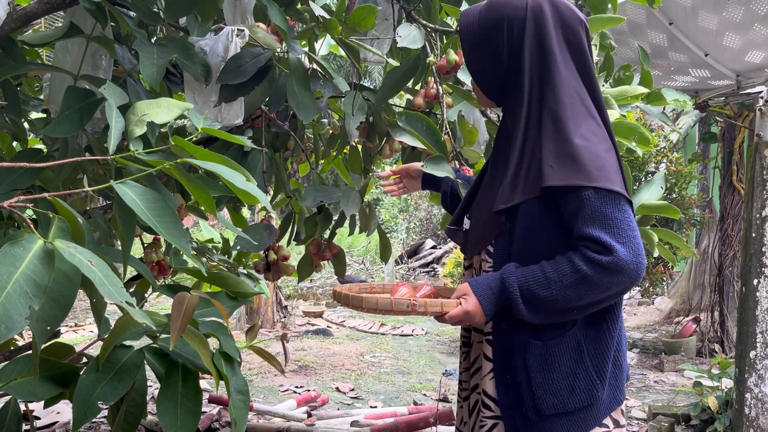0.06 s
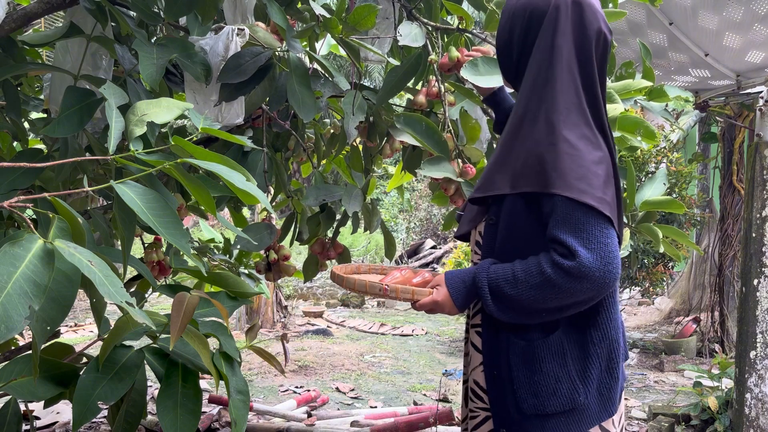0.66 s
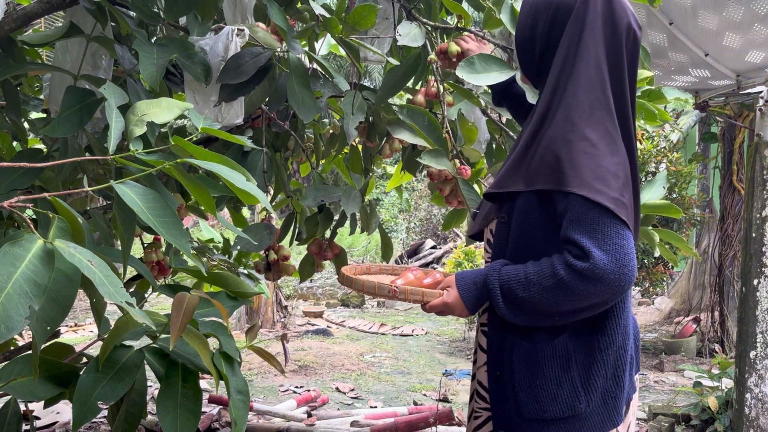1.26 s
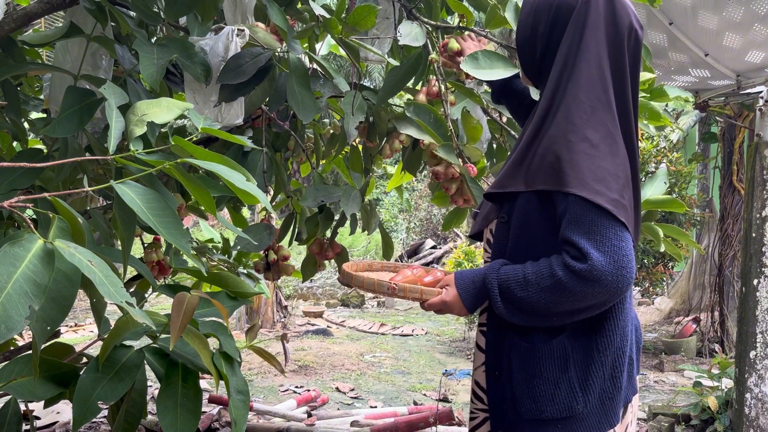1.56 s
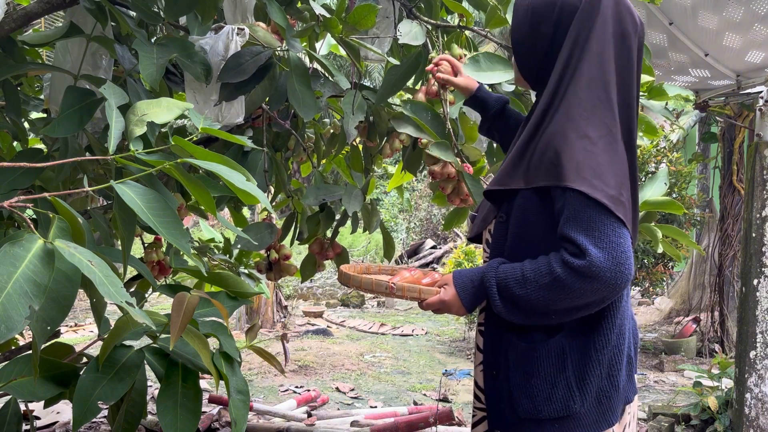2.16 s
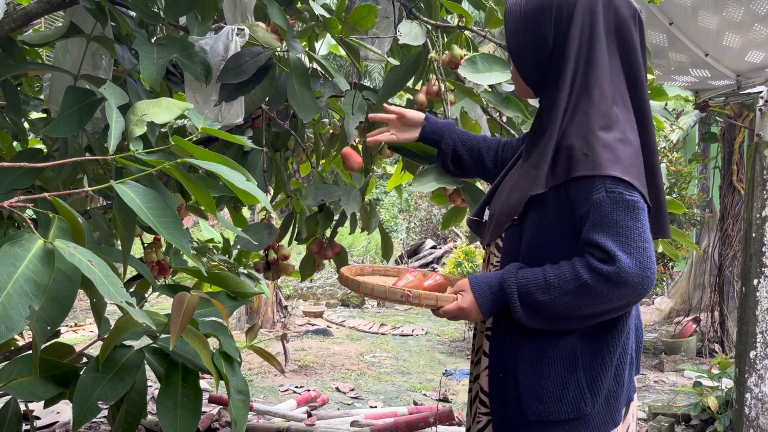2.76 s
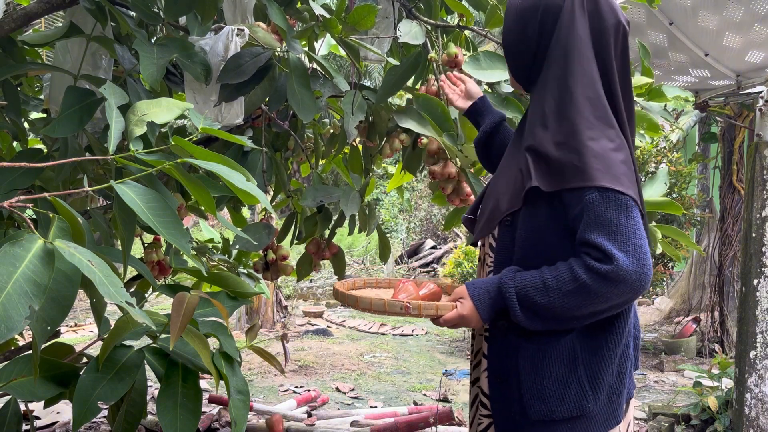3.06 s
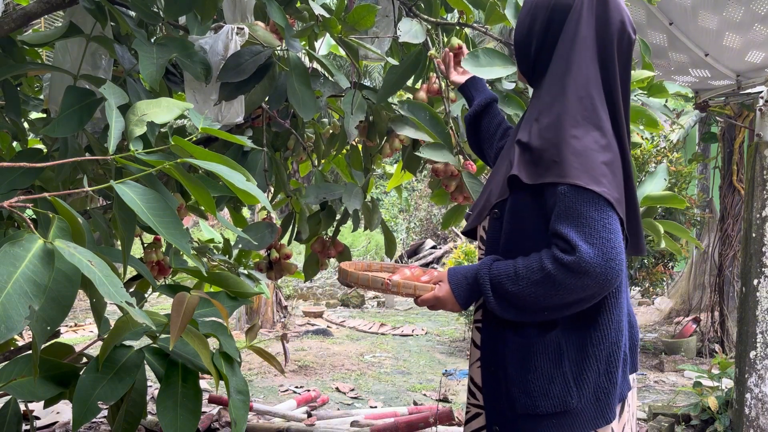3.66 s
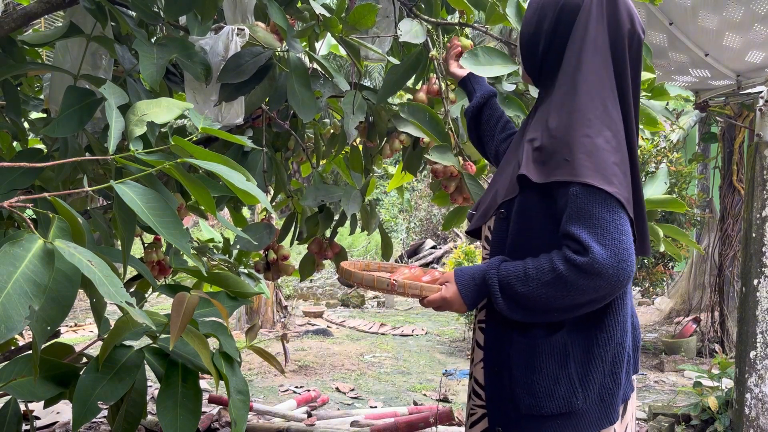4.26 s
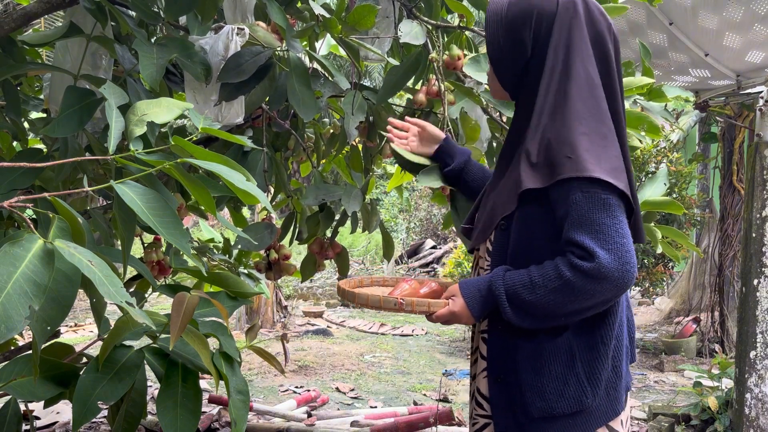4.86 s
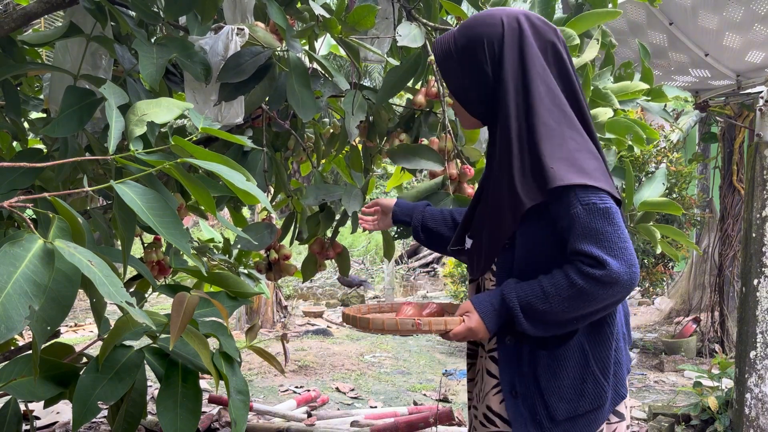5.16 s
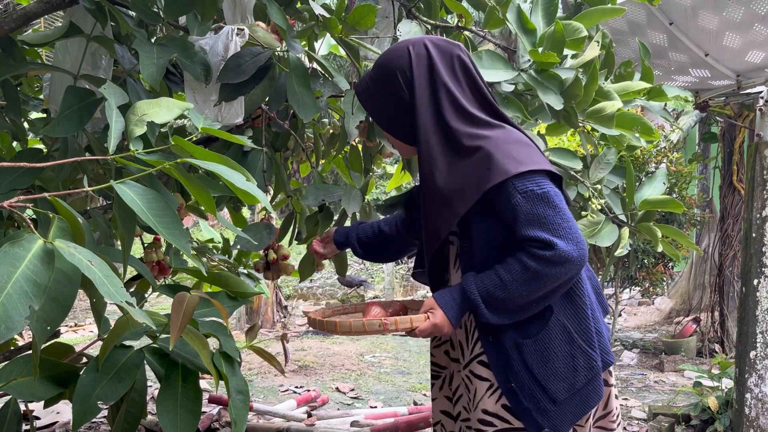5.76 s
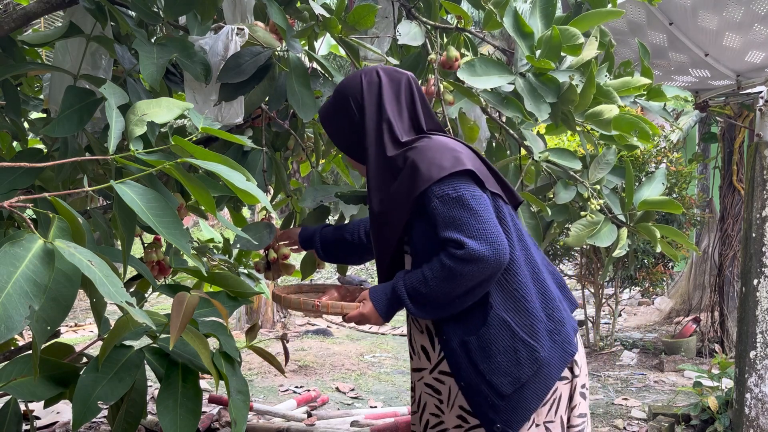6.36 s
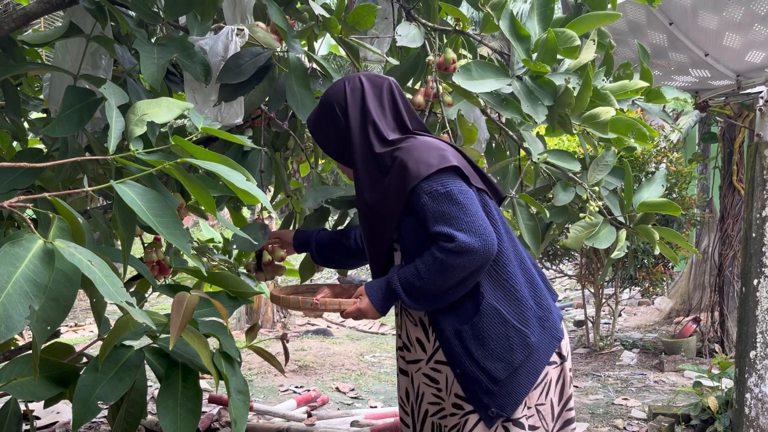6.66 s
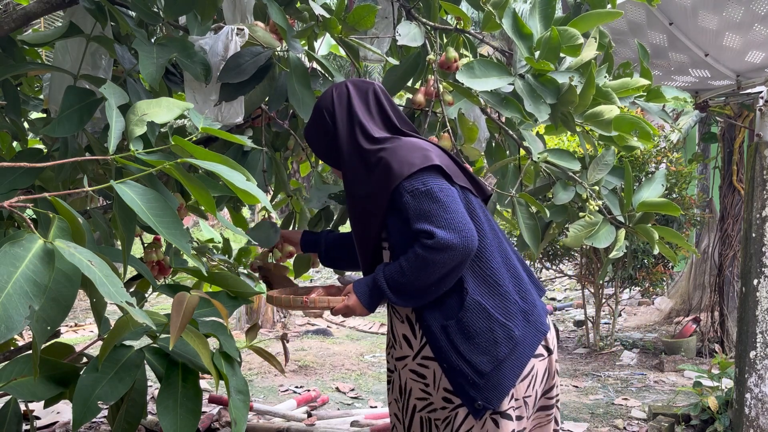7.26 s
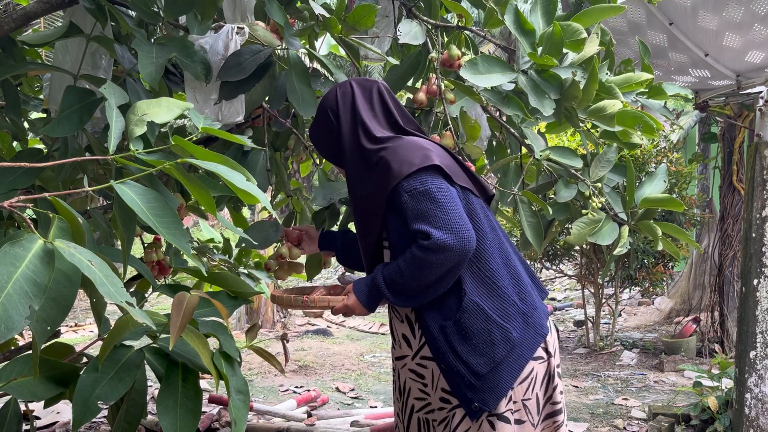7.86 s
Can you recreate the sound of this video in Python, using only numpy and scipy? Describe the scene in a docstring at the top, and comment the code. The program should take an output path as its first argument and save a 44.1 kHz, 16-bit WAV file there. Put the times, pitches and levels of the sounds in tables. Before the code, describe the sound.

Close by in a quiet garden, leaves rustle, a stalk snaps and picked fruit drops onto dry leaves with a crunchy thud. After a lull another fruit lands with a hollow knock and bounces. Then comes a longer spell of rustling with sharp snaps and tearing as more is pulled off, and one last light drop. Birds call softly throughout, over faint clucks, insects and a low distant rumble.

```python
"""Small fruit is picked from a garden tree: leaves rub, stalks snap and tear, and loose fruit
drops onto leaf litter with a crunch, a thud, a hollow ring and a bounce. Feet shift on the soil.
Behind it, a bird repeats arched calls, small birds whistle, far fowl cluck and insects buzz
over a low distant rumble."""
import sys
import numpy as np
from scipy import signal
from scipy.fft import rfft, irfft
from scipy.io import wavfile
from scipy.ndimage import uniform_filter1d

SR = 44100
rng = np.random.default_rng(int(sys.argv[2]) if len(sys.argv) > 2 else 0)


def to_wav(sig):
    """Store sig (one row per channel, or 1-D mono) as 16-bit WAV at the path in sys.argv[1].

    Samples outside -1..1 are clipped; the rate is SR.
    """
    pcm = np.clip(np.atleast_2d(sig), -1, 1) * 32767
    pcm = np.round(pcm).astype(np.int16)
    wavfile.write(sys.argv[1], SR, pcm.T)  # frames by channels


N = 353682

# Distant rumble and air. Each row: frequency in Hz, gain in dB.
AIR_SPECTRUM = [(15, -87), (25, -34.5), (70, 1), (110, -0.5), (160, -4), (230, -17.5), (350, -22.5),
                (640, -25), (1400, -29), (2700, -27), (4300, -27), (6500, -37.5), (10000, -47),
                (16000, -46.5)]
# Each row: start in seconds, length in seconds, centre in Hz, width in Hz, level in dB, swell in dB.
INSECT_BUZZES = [(0, 2.14, 9950, 750, -79.5, 4), (3.3, 1.7, 9620, 700, -84, 0),
                 (1.85, .4, 7550, 300, -88, 0), (3.4, .16, 7550, 300, -85, 0),
                 (7.3, .72, 7600, 300, -88, 0)]
# Each row: start in seconds, length in seconds, start and end pitch in Hz, throat resonance in Hz,
# hoarseness from 0 to 1, relative level in dB.
FOWL_CLUCKS = [(1.126, 0.039, 270, 345, 695, .6, -66.5), (1.152, 0.042, 358, 362, 1065, 0.72, -62.5),
               (1.191, 0.03, 363, 316, 704, 0.9, -68.5), (2.785, 0.16, 439, 468.6, 1480, 0.44, -69.5),
               (2.906, 0.1305, 469, 404, 1154, 0.38, -68), (7.941, 0.17, 412, 510, 1390, 0.33, -67.5)]
# Birds that keep chirping. Each row: pitch in Hz, chirps per second, level in dB.
FAR_BIRDS = [(3360, 3, -78.5), (4220, 4, -77.5)]
# Small birds. Each row: start and length in seconds, start and end pitch in Hz, relative level in dB.
FAR_CHIRPS = [(.234, 0.078, 4570, 5030, -54.5), (1.442, 0.04, 5300, 3620, -67),
              (1.472, 0.053, 5340, 5350, -65.5), (1.582, 0.024, 3410, 3270, -61),
              (1.797, .16, 4630, 4680, -67.5), (2.04, .11, 3470, 3490, -65.5),
              (2.308, 0.044, 3440, 3480, -65.5), (3.911, 0.03, 5000, 3650, -67.5),
              (4.276, .097, 4280, 3940, -70), (4.539, .085, 3450, 3140, -67),
              (4.798, 0.098, 3116, 3054, -65.5), (5.016, 0.12, 4200, 4190, -60.5),
              (6.86, 0.0676, 4440, 4140, -64)]
CLEAR_WHISTLES = [(2.085, 0.091, 2685, 4020, -59.5), (5.42, 0.059, 4530, 4790, -50),
                  (5.825, 0.068, 3410, 4180, -51), (6.545, 0.042, 2410, 2436, -63.5),
                  (6.745, 0.085, 3255, 4460, -54)]
# Near bird's call. Each row: share of the call's length, share of its top pitch.
CALL_ARCH = [(0, .8), (.15, .94), (.32, 1), (.64, .96), (.82, .83), (1, .71)]
# Its phrase. Each row: offset in seconds, pitch ratio to the opening call, accent in dB.
CALL_PHRASE = [(0, 1, -5), (.077, 1.155, -1), (.176, 1.2, 0), (.382, 1.14, -1), (.586, 1.14, -5),
               (.78, 1.195, -5), (1.06, 1.095, 0), (1.32, 1.115, -1)]
# Its songs. Each row: start in seconds, number of calls, opening pitch in Hz, level in dB.
SONGS = [(0.15, 1, 2004, -49), (0.971, 4, 1987, -55), (2.185, 1, 1925, -58), (2.348, 1, 1840, -62),
         (2.557, 4, 1893, -58.5), (4.005, 8, 1960, -59), (6.814, 2, 1920, -56.5), (7.014, 1, 1840, -62.5),
         (7.516, 3, 1876, -58.5)]

# Feet on soil. Each row: start in seconds, level in dB, T60 in seconds.
FOOT_SHIFTS = [(5.935, -50, 0.64), (6.059, -60, 1)]
# The pulled branch. Each row: time in seconds, level of its leaves in dB.
BRANCH_SWAY = [(0, -75), (.2, -70), (.4, -59.5), (.68, -77.5), (1.0, -70.5), (1.4, -88), (2.5, -97),
               (2.68, -78.5), (3.4, -88), (4.5, -87), (4.92, -66.5), (5.4, -63), (5.9, -57.5), (6.4, -59.5),
               (6.6, -67.5), (7.22, -68), (7.48, -75.5), (8.02, -76)]
# The hand in the leaves. Each row: peak time in seconds, hold in seconds, level in dB.
HAND_STROKES = [(0.268, 0.073, -54), (0.502, 0.051, -56), (4.95, .06, -59), (5.21, 0.029, -59),
                (5.497, 0.038, -46), (5.58, 0.029, -52), (6.034, 0.031, -52), (6.203, .085, -44),
                (7.63, 0.13, -66)]
# Rubbing leaves. Each row: frequency in Hz, gain in dB.
LEAF_HISS_SPECTRUM = [(600, -11.5), (1500, 0), (2500, 2), (4000, 3), (6000, 1.5), (9000, -1.5), (13000, -2),
                      (16000, -11.5)]
LEAF_BODY_SPECTRUM = [(100, -13.5), (250, 1), (500, -2), (800, 0), (1200, -2), (2000, -7), (3500, -7.5),
                      (8000, -54)]
# Stalks breaking. Each row: start in seconds, crack in dB, knock relative to the crack in dB.
STALK_SNAPS = [(0.1984, -43.5, -25), (.2761, -26, -14), (1.5684, -45, -1.5), (2.609, -55.5, -26),
               (3.557, -58, -1.5), (4.6023, -50, -41), (5.004, -43, -29), (5.2630, -55, 10.5),
               (5.374, -41, 0), (5.5511, -26.5, -4), (5.5538, -19.5, -2.5), (5.6059, -31, -7),
               (5.6470, -40.5, 3.5), (5.709, -36, -7), (5.8107, -31.5, -3), (5.9902, -48.5, 12.5),
               (6.2745, -28, -7), (6.2862, -24.5, -24), (6.3111, -33.5, -13), (6.414, -42, -7),
               (6.7357, -39.5, -7.5), (6.7883, -32.5, -3.5), (6.871, -39.5, 0), (6.942, -39.5, -29),
               (7.1560, -51.5, -3.5)]
# Fibre crack and woody knock. Each row: frequency in Hz, gain in dB.
CRACK_SPECTRUM = [(800, -6.5), (2500, -5.5), (5500, -3.5), (8000, -5.5), (12000, -7.5), (16000, -11.5)]
KNOCK_SPECTRUM = [(200, -46), (700, -3), (1150, 2.5), (1600, 5), (2100, 5), (3000, -3.5), (7000, -78)]
# Fruit landing. Each row: start and time to sink through the litter in seconds; crunch, thud, slap
# and ring in dB; ring tilt in dB per octave; gap between settling contacts in seconds.
FRUIT_DROPS = [(.1000, 0.00361, -35, -31.5, -35.5, -36.5, -8.5, .0121),
               (0.2663, 0.0046, -33, -36, -30, -51.5, 6, .007),
               (3.1760, .0085, -31.5, -38, -26.5, -37.5, 3, 0.00445),
               (7.6408, 0.0039, -31.5, -47, -45.5, -65.5, -4, .008)]
# Each row: start in seconds, then thud, ring and crunch in dB.
FRUIT_BOUNCES = [(.1470, -45.5, -43, -56), (3.202, -43, -38, -47.5), (3.2490, -49, -62, -60),
                 (3.2990, -47, -50, -60), (3.3530, -55.5, -77, -56), (3.5390, -61, -72, -79),
                 (7.6775, -51.5, -72, -51)]
# The hollow litter. Each row: frequency in Hz, gain in dB, T60 in seconds.
LITTER_MODES = [(245.2, -18, 0.23), (385, -23, 0.12), (544, 6, 0.1), (565, -4.5, 0.096), (872, -5.5, 0.07),
                (938, -3.5, 0.1), (1210, 11, 0.067), (1560, -17, 0.077), (2150, -31, 0.035),
                (2440, -31, 0.028)]
# Fruit on litter. Each row: frequency in Hz, gain in dB.
THUD_SPECTRUM = [(60, -49), (140, -6.5), (240, 3.5), (320, -1.5), (420, -4.5), (540, -13.5), (750, -3.5),
                 (1000, -14), (1500, -32), (5000, -37)]
SLAP_SPECTRUM = [(150, -25), (500, -10.5), (900, -3), (1400, -2.5), (2200, -4), (3200, -22.5),
                 (8000, -26.5)]
CRUNCH_SPECTRUM = [(500, -4.5), (2000, -1.5), (3200, -0.5), (4300, -3.5), (5500, 2), (7000, -5.5),
                   (8500, -7), (11000, -11.5), (16000, -15)]


def undb(db):
    """Decibels to gain."""
    return 10 ** (np.asarray(db) / 20)


def unit(x):
    """Scale to rms 1."""
    return x / np.sqrt(np.mean(x ** 2) + 1e-18)


def seconds(length_s):
    """Sample times of a short sound."""
    return np.arange(max(int(length_s * SR), 16)) / SR


def fade(t, t60_s):
    """Exponential decay."""
    return np.exp(-np.log(1000) * t / t60_s)


def add(out, at_s, x):
    """Mix a sound in at a time."""
    i = int(np.clip(at_s * SR, 0, N - 1))
    out[i:i + len(x)] += x[:N - i]


def colour(x, spectrum, size=4096):
    """Minimum-phase filter of unit power through (Hz, dB) points."""
    hz, db = np.transpose(spectrum)
    gain = undb(np.interp(np.log(np.fft.rfftfreq(size, 1 / SR) + 1), np.log(hz), db))
    cepstrum = irfft(np.log(unit(gain)))
    cepstrum[1:size // 2] *= 2
    cepstrum[size // 2 + 1:] = 0
    return signal.fftconvolve(x, irfft(np.exp(rfft(cepstrum))))[:len(x)]


def noise(count=N):
    """White noise."""
    return rng.standard_normal(count)


def wander(rate_hz, count=N, knots=4096):
    """Random drift with a spread near 1."""
    return np.interp(np.arange(count) / SR * rate_hz, np.arange(knots), noise(knots))


def moments(per_s, count=128):
    """Loosely spaced random times in seconds."""
    times_s = (np.arange(count) + rng.random(count)) / per_s
    return times_s[times_s < N / SR]


def grains(per_s, spread_db):
    """Random clicks of uneven size."""
    clicks = (rng.random(N) < per_s / SR) * np.sign(noise())
    return unit(clicks * undb(spread_db * np.minimum(rng.exponential(size=N), 4)))


def bursts(times_s, levels_db, t60s_s):
    """Envelope of sudden blows that die away."""
    power = np.zeros(N)
    for at_s, db, t60_s in zip(times_s, levels_db, t60s_s):
        add(power, at_s, (undb(db) * fade(seconds(1.5 * t60_s), t60_s)) ** 2)
    return np.sqrt(power)


def reflections(x, t60_s, wet_db, delay_s, cutoff_hz):
    """Ground, foliage and walls return a late, duller, fading tail."""
    t = seconds(1)
    tail = signal.sosfilt(signal.butter(1, cutoff_hz, fs=SR, output="sos"), noise(len(t)))
    tail *= fade(t, t60_s) * np.clip(t / delay_s - 1, 0, 1)
    return undb(wet_db) * signal.fftconvolve(x, unit(tail) / np.sqrt(len(t)))[:N]


def syllable(length_s):
    """Progress through a call from 0 to 1, and its soft-edged envelope."""
    t = seconds(length_s)
    progress = t / t[-1]
    return progress, np.clip(np.minimum(progress, 1 - progress) / .15, 0, 1)


def whistles(notes, flutter):
    """Sine notes that glide in pitch, fastest at the start."""
    out = np.zeros(N)
    for at_s, length_s, start_hz, end_hz, db in notes:
        progress, envelope = syllable(length_s)
        pitch_hz = start_hz + (end_hz - start_hz) * np.sin(progress * np.pi / 2)
        pitch_hz *= 1 + flutter * wander(700, len(progress), knots=512)
        add(out, at_s, undb(db) * envelope * np.sin(2 * np.pi * np.cumsum(pitch_hz) / SR))
    return out


def garden_air(level_db=-62.5):
    """A smooth wash of air whose distant low rumble throbs."""
    air = unit(colour(noise(), AIR_SPECTRUM))
    rumble = signal.sosfilt(signal.butter(1, 200, fs=SR, output="sos"), air)
    throb = undb(2.1 * wander(rate_hz=25))
    return undb(level_db) * (air + rumble * (throb - 1))


def far_chorus(count=130, note_s=.07):
    """Far birds blurred by reflection."""
    when, height, slide, strength = rng.random((count, 4)).T
    start_hz = 2900 + 2700 * height ** 2
    end_hz = start_hz * (.94 + .086 * slide)
    notes = zip(when * N / SR, np.full(count, note_s), start_hz, end_hz, -79 + 6 * strength)
    return reflections(whistles(notes, flutter=.023), t60_s=.14, wet_db=0, delay_s=.004, cutoff_hz=6700)


def insects(edge_s=.14):
    """Shrill buzzing in narrow noise bands."""
    t, out = np.arange(N) / SR, np.zeros(N)
    for at_s, length_s, hz, width_hz, db, swell_db in INSECT_BUZZES:
        band = signal.butter(2, [hz - width_hz / 2, hz + width_hz / 2], "band", fs=SR, output="sos")
        gain = undb(db + swell_db * np.clip((t - at_s) / length_s - .5, -.5, .5))
        gate = np.clip(np.minimum(t - at_s, at_s + length_s - t) / edge_s, 0, 1)
        out += gain * gate * unit(signal.sosfilt(band, noise()))
    return out * undb(wander(rate_hz=35))


def fowl():
    """Far clucks: voice and rasp through one throat resonance."""
    out = np.zeros(N)
    for at_s, length_s, start_hz, end_hz, throat_hz, hoarse, db in FOWL_CLUCKS:
        progress, envelope = syllable(length_s)
        pitch_hz = start_hz + (end_hz - start_hz) * progress
        pitch_hz *= 1 + .02 * wander(300, len(progress), knots=512)
        phase = 2 * np.pi * np.cumsum(pitch_hz) / SR
        throat = [(300, -20), (throat_hz * .7, -15), (throat_hz, 0), (throat_hz * 1.35, -18), (5000, -45)]
        voice = unit(colour(sum(np.cos(k * phase) for k in range(1, 8)), throat))
        rasp = unit(colour(noise(len(progress)), throat))
        add(out, at_s, undb(db) * envelope * ((1 - hoarse) * voice + hoarse * rasp))
    return undb(6.5) * out + reflections(out, t60_s=.33, wet_db=-3.1, delay_s=.0041, cutoff_hz=5000)


def hidden_birds(chirp_s=.0733, fall=.073, pitch_spread=.05):
    """Each far bird repeats a slightly falling note around its own pitch."""
    notes = []
    for centre_hz, per_s, db in FAR_BIRDS:
        for at_s, chance in zip(moments(per_s), noise(128)):
            hz = centre_hz * (1 + pitch_spread * chance)
            notes.append((at_s, chirp_s, hz, hz * (1 - fall), db))
    return whistles(notes, flutter=.028)


def near_bird(ref_length_s=.074, ref_hz=2250, stretch=1.94):
    """Songs share one phrase; each call rises, holds and drops, and higher calls last longer."""
    out = np.zeros(N)
    for at_s, count, opening_hz, db in SONGS:
        for offset_s, ratio, accent_db in CALL_PHRASE[:round(count)]:
            top_hz = opening_hz * ratio
            progress, envelope = syllable(ref_length_s * (top_hz / ref_hz) ** stretch)
            arch = uniform_filter1d(np.interp(progress, *np.transpose(CALL_ARCH)), size=300)
            pitch_hz = top_hz * arch * (1 + .014 * wander(500, len(progress), knots=512))
            phase = 2 * np.pi * np.cumsum(pitch_hz) / SR
            tone = np.sin(phase) + undb(-23) * np.sin(2 * phase) + undb(-27) * np.sin(3 * phase)
            effort_db = 5 * (progress - .5) + 2 * wander(108, len(progress), knots=512)
            add(out, at_s + offset_s, undb(db + accent_db + effort_db) * envelope * tone)
    return out


def birds():
    """Calls linger among the trees; hidden birds arrive by reflection only."""
    near = near_bird()
    far = whistles(FAR_CHIRPS, flutter=.016)
    clear = whistles(CLEAR_WHISTLES, flutter=.013)
    out = near + undb(-6) * far + undb(-5) * clear
    add(out, .024, undb(-9) * near)  # one short echo
    out += reflections(near, t60_s=.23, wet_db=-6, delay_s=.009, cutoff_hz=4500)
    out += reflections(clear, t60_s=.42, wet_db=-4, delay_s=.0082, cutoff_hz=7000)
    return out + reflections(far + hidden_birds(), t60_s=.46, wet_db=0, delay_s=.0011, cutoff_hz=5100)


def feet():
    """Weight settles on soft soil with a low bump."""
    soil_spectrum = [(40, -11), (100, 6), (160, -1.5), (400, -23), (2000, -72)]
    return colour(noise() * bursts(*np.transpose(FOOT_SHIFTS)), soil_spectrum)


def brushing_db(attack_s=.038, t60_s=.18):
    """Leaf level: branch sway plus hand strokes that swell, hold and decay."""
    t = np.arange(N) / SR
    power = undb(np.interp(t, *np.transpose(BRANCH_SWAY))) ** 2
    for at_s, hold_s, db in HAND_STROKES:
        swell = np.clip(1 + (t - at_s) / attack_s, 0, 1) ** 2
        decay = fade(np.clip(t - at_s - hold_s, 0, 2), t60_s)
        power += (undb(db) * swell * decay) ** 2
    return 10 * np.log10(power)


def leaves(brush_db):
    """Sliding leaves make dense grains; catching edges add sparse ticks."""
    friction = grains(per_s=12000, spread_db=2.5) + undb(-9) * grains(per_s=220, spread_db=3)
    hiss = friction * undb(brush_db + 1.7 * wander(rate_hz=90))
    body_db = -67.5 + .88 * (brush_db + 60)  # grows more slowly than the hiss
    body = grains(per_s=4000, spread_db=4.4) * undb(body_db)
    return colour(hiss, LEAF_HISS_SPECTRUM) + colour(body, LEAF_BODY_SPECTRUM)


def snapping_stalks(brush_db, snap_t60_s=.0062, tear_db=-13.5, tear_t60_s=.083):
    """Fibres crack, the twig knocks, the last fibres tear; small twigs tick as hard as leaves move."""
    breaks = []
    for at_s, db, woody_db in STALK_SNAPS:
        breaks.append((at_s, db, db + woody_db, snap_t60_s))
        breaks.append((at_s, db + tear_db, db + tear_db + woody_db, tear_t60_s))
    for at_s, jitter_db in zip(moments(per_s=11), 1 - 2 * rng.random(128)):
        tick_db = brush_db[int(at_s * SR)] + 14.5 + jitter_db
        breaks.append((at_s, tick_db, tick_db - 3.5, snap_t60_s))
    times_s, crack_db, knock_db, t60_s = np.transpose(breaks)
    crack = colour(np.sign(noise()) * bursts(times_s, crack_db, t60_s), CRACK_SPECTRUM)
    knock = colour(np.sign(noise()) * bursts(times_s, knock_db, t60_s), KNOCK_SPECTRUM)
    return crack + knock


def fruit_contacts(touch_db=-9, settle_db=-7.5, crushed_db=-7.5):
    """Fruit touches the litter, hits the ground and settles ever softer and duller; some bounce."""
    # Each row: start in seconds, ring in dB, tilt in dB per octave, thud, slap and crunch in dB,
    # T60 in seconds.
    rows = []
    for at_s, sink_s, crunch_db, thud_db, slap_db, ring_db, tilt, gap_s in FRUIT_DROPS:
        rows.append((at_s, ring_db + touch_db, tilt,
                     thud_db + touch_db, slap_db + touch_db, crunch_db, .032))
        for k in range(3):  # the impact, then two settling contacts
            rows.append((at_s + sink_s + k * gap_s, ring_db - 2 * k, tilt - 2 * k,
                         thud_db + k * settle_db, slap_db - 14 * k,
                         crunch_db + crushed_db + k * settle_db, .079 if k else .046))
    for at_s, thud_db, ring_db, crunch_db in FRUIT_BOUNCES:
        rows.append((at_s, ring_db, -7.5, thud_db, thud_db - 5.5, crunch_db, .1))
    return rows


def falling_fruit(detune=.007, pivot_hz=560):
    """Each contact thuds, slaps, crushes dry leaves and rings the hollow litter."""
    times_s, ring_db, tilts, thud_db, slap_db, crunch_db, t60_s = np.transpose(fruit_contacts())
    t, ring = seconds(.3), np.zeros(N)
    for at_s, db, tilt_db_per_octave in zip(times_s, ring_db, tilts):
        for hz, mode_db, mode_t60_s in LITTER_MODES:
            wave = np.sin(2 * np.pi * hz * (1 + detune * rng.standard_normal()) * t)
            gain = undb(db + mode_db + tilt_db_per_octave * np.log2(hz / pivot_hz))
            add(ring, at_s, gain * fade(t, mode_t60_s) * wave)
    thud = colour(noise() * bursts(times_s, thud_db, t60_s), THUD_SPECTRUM)
    slap = grains(per_s=9000, spread_db=.52) * bursts(times_s, slap_db, t60_s)
    crunch = grains(per_s=12000, spread_db=3.7) * bursts(times_s, crunch_db, t60_s)
    return ring + thud + colour(slap, SLAP_SPECTRUM) + colour(crunch, CRUNCH_SPECTRUM)


def scene():
    """The picking, its reflections and the garden around it, in mono."""
    brush_db = brushing_db()
    picking = falling_fruit() + snapping_stalks(brush_db) + leaves(brush_db) + feet()
    early = reflections(picking, t60_s=.06, wet_db=-13.5, delay_s=.001, cutoff_hz=16000)
    late = reflections(picking, t60_s=.35, wet_db=-25, delay_s=.026, cutoff_hz=14000)
    garden = birds() + fowl() + insects() + garden_air() + far_chorus()
    return (picking + early + late + garden)[None]


def record(dry):
    """The deepest bass and the very top are rolled off."""
    low_hz, top_hz = 42, 15800
    highpass = signal.butter(3, low_hz, "high", fs=SR, output="sos")
    lowpass = signal.ellip(10, .2, 70, top_hz, fs=SR, output="sos")
    return signal.sosfilt(lowpass, signal.sosfilt(highpass, dry))


dry = scene()
out = record(dry)
to_wav(out)
```